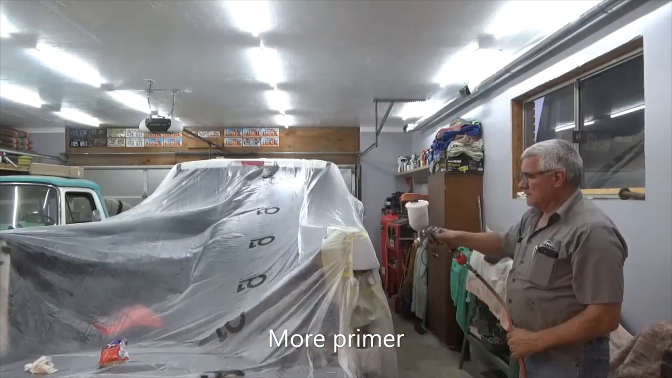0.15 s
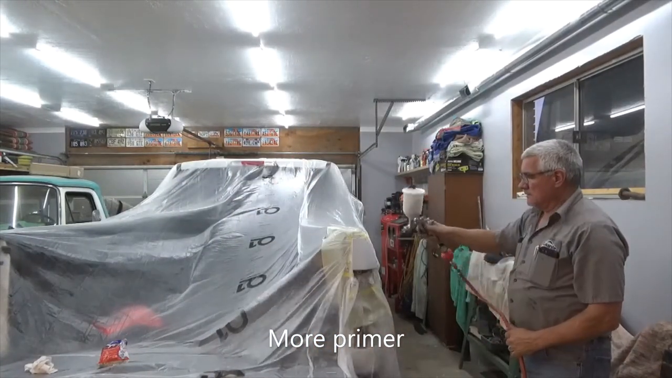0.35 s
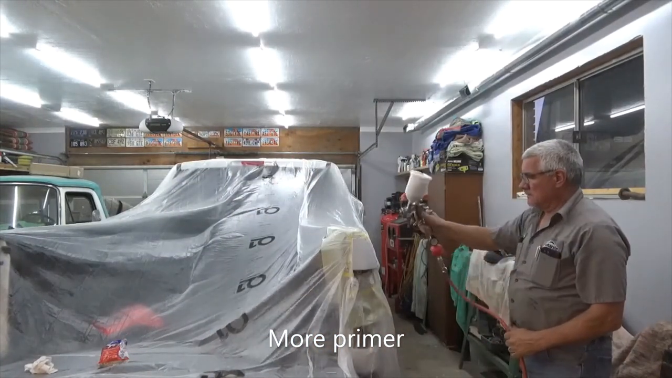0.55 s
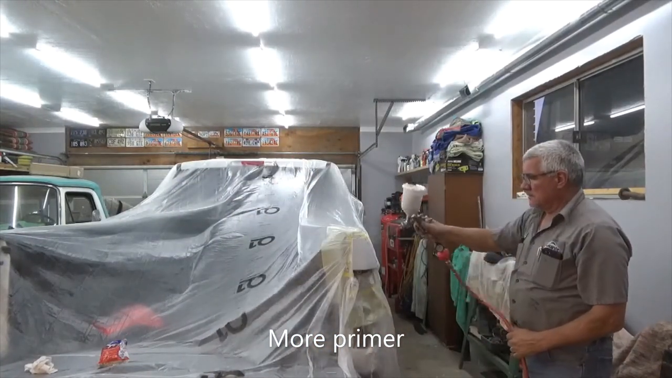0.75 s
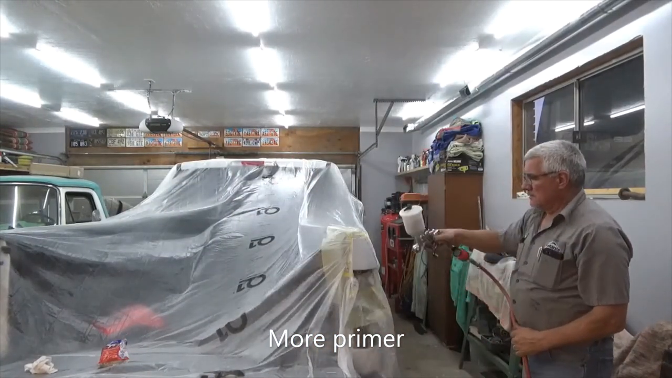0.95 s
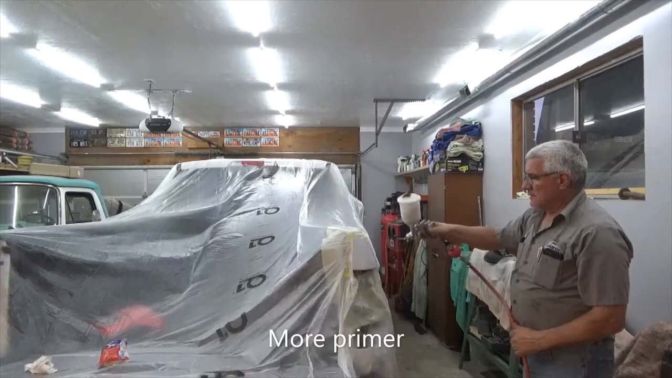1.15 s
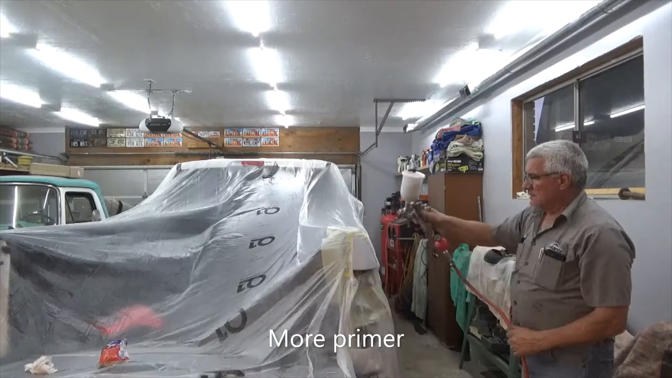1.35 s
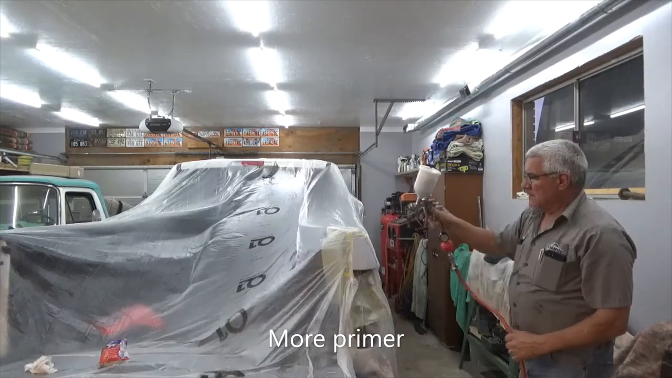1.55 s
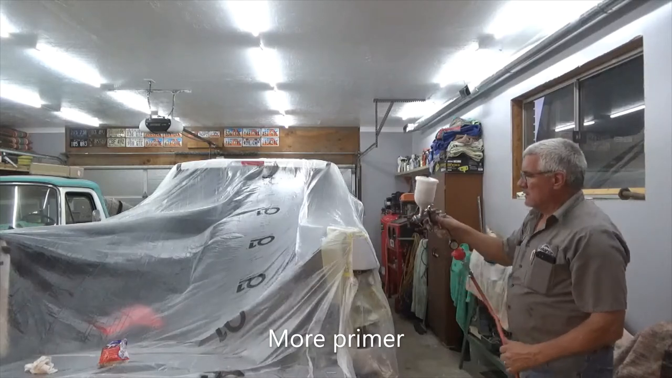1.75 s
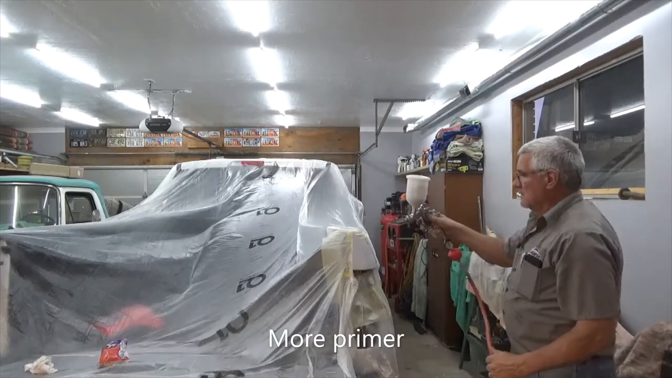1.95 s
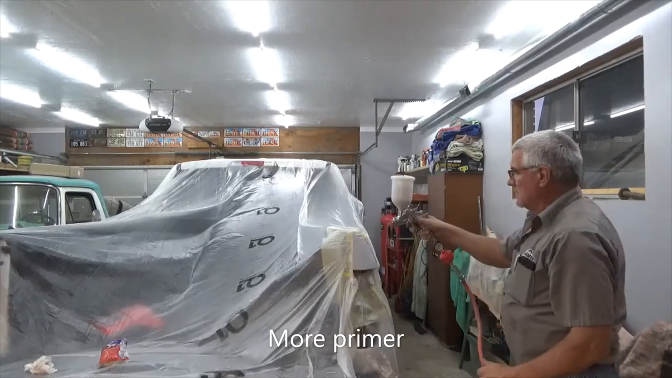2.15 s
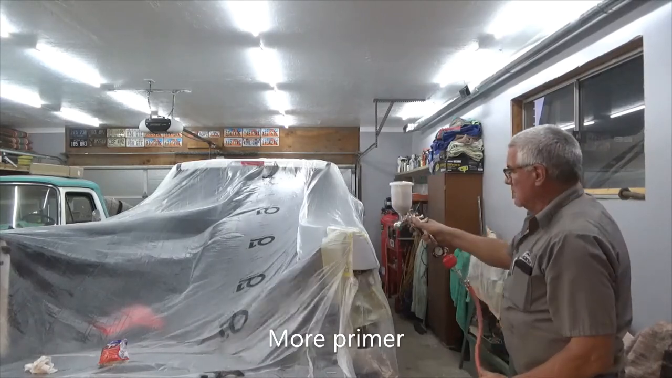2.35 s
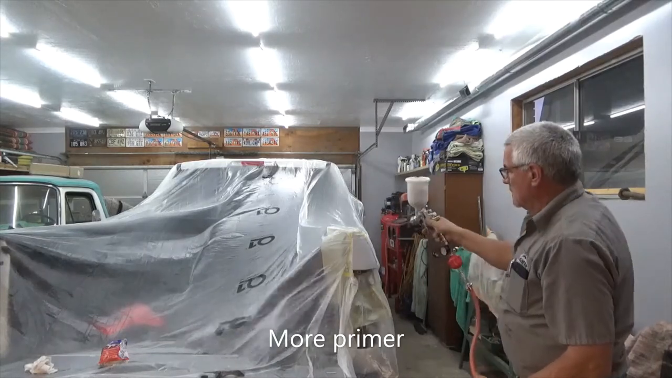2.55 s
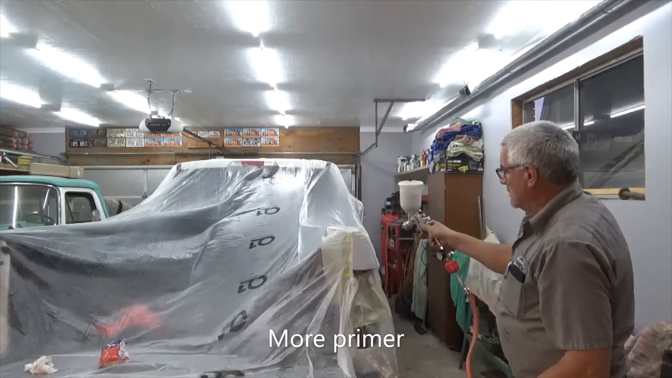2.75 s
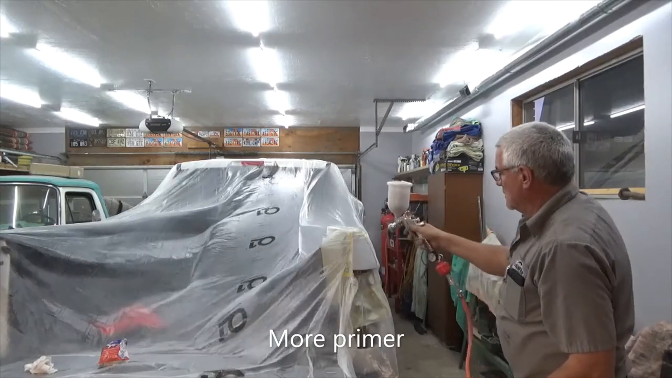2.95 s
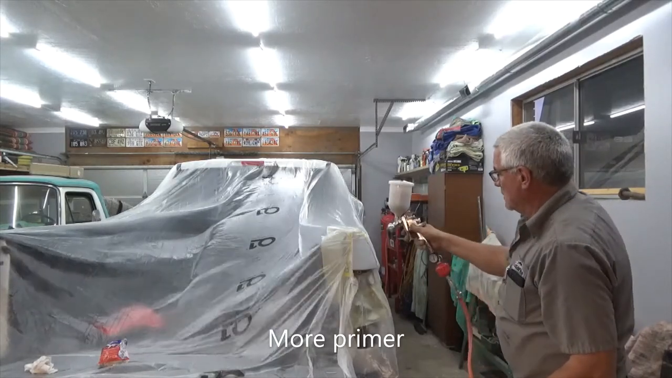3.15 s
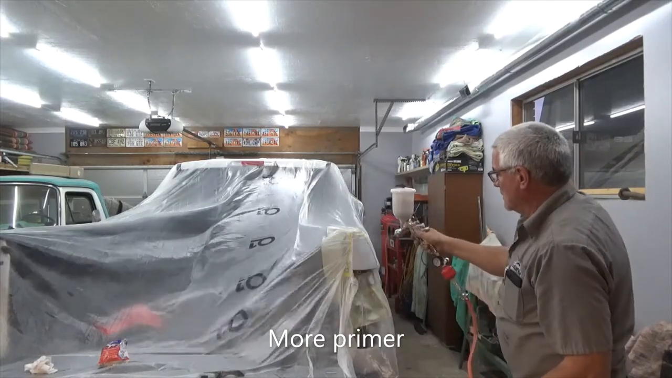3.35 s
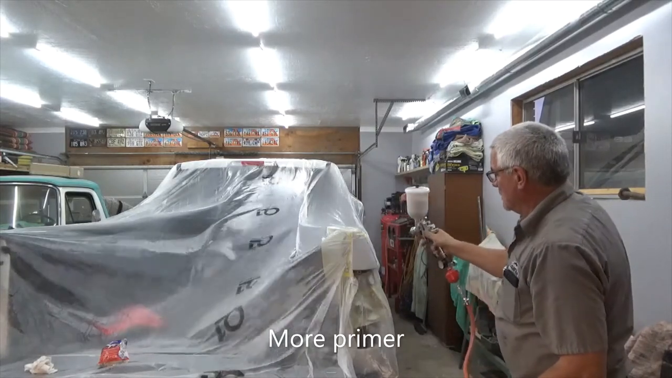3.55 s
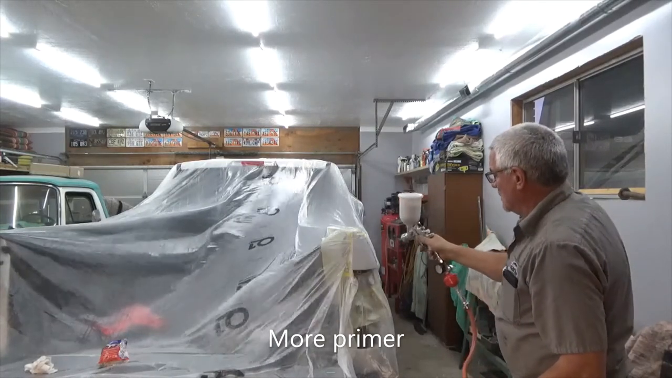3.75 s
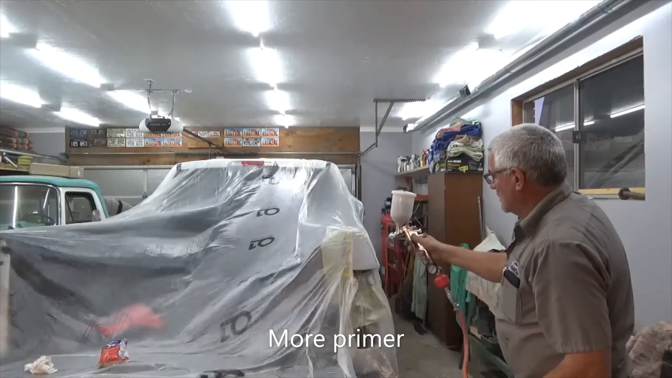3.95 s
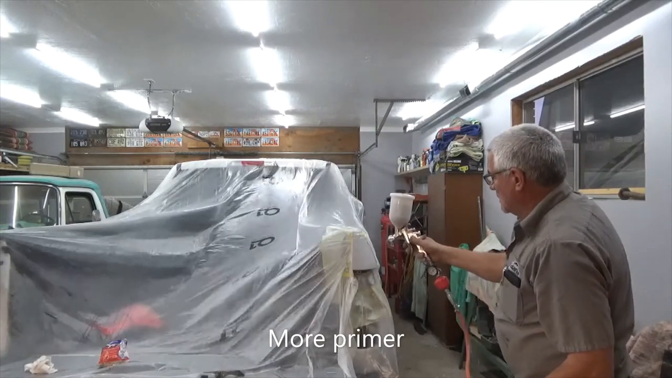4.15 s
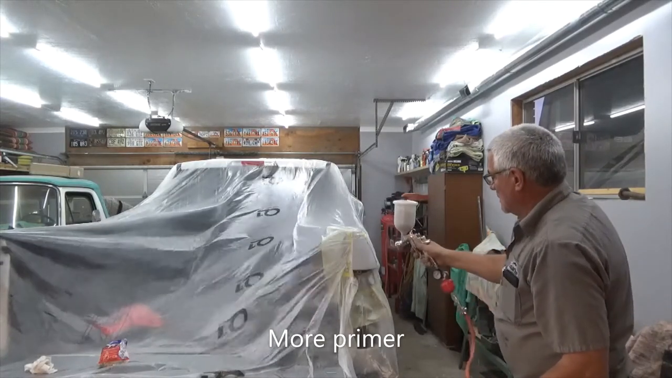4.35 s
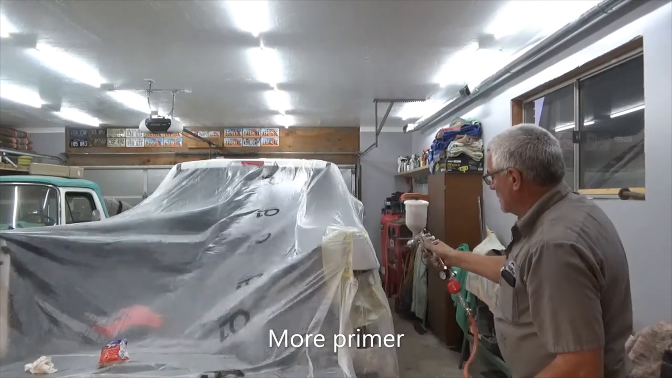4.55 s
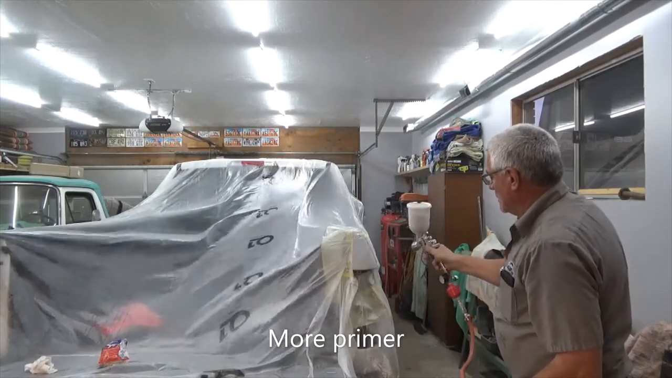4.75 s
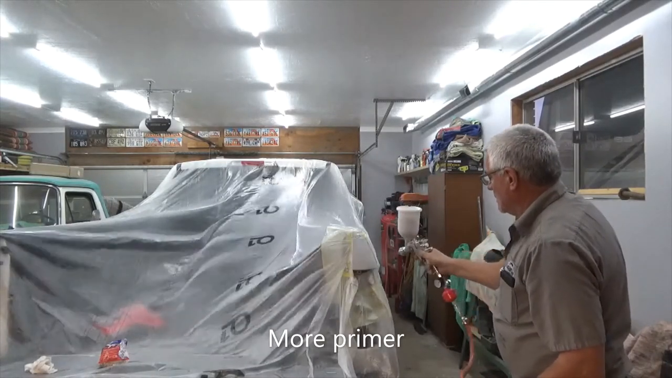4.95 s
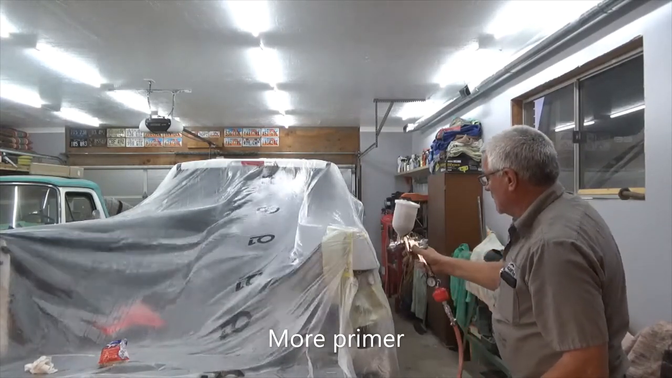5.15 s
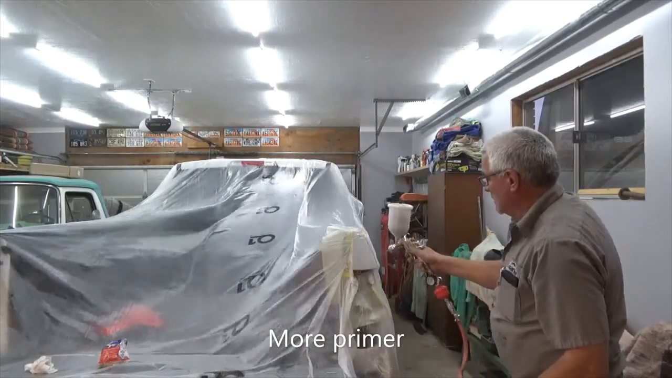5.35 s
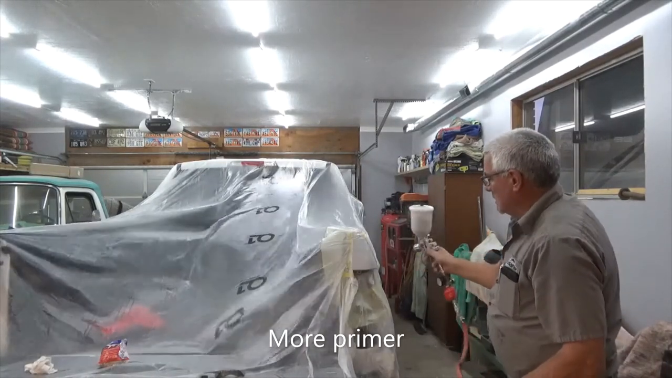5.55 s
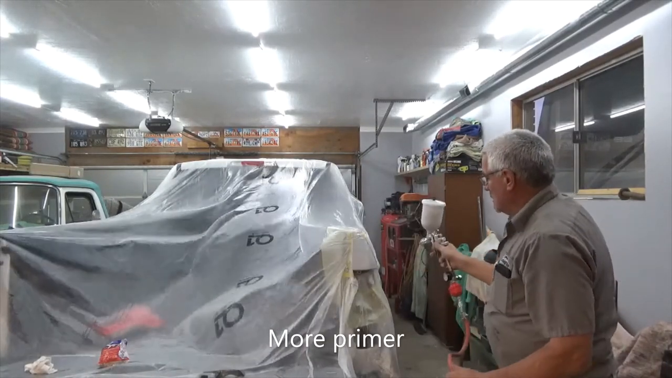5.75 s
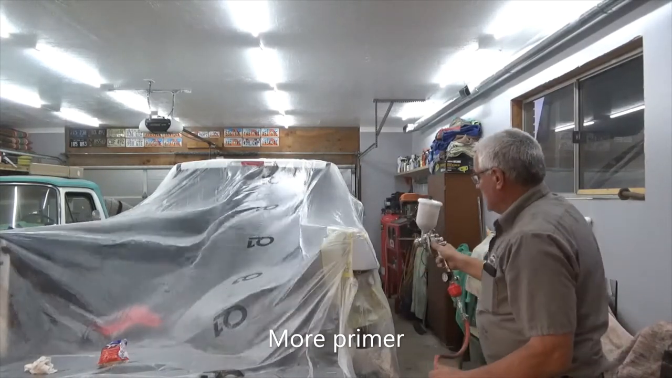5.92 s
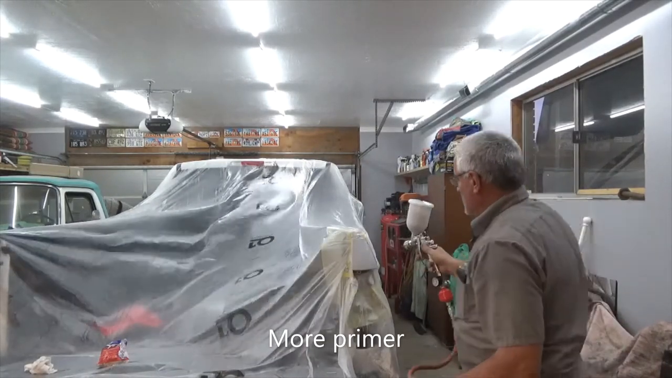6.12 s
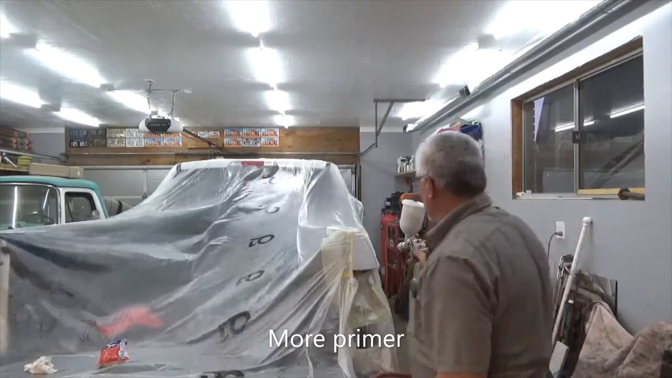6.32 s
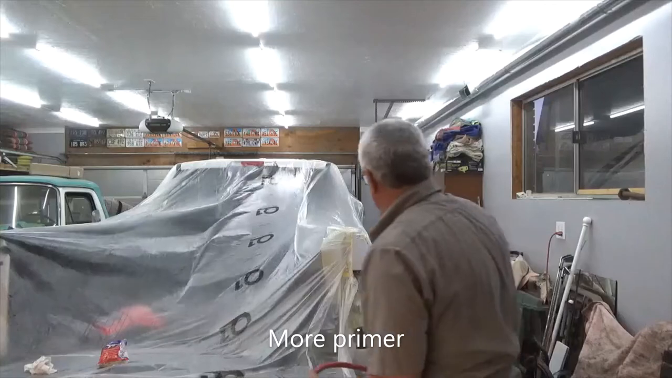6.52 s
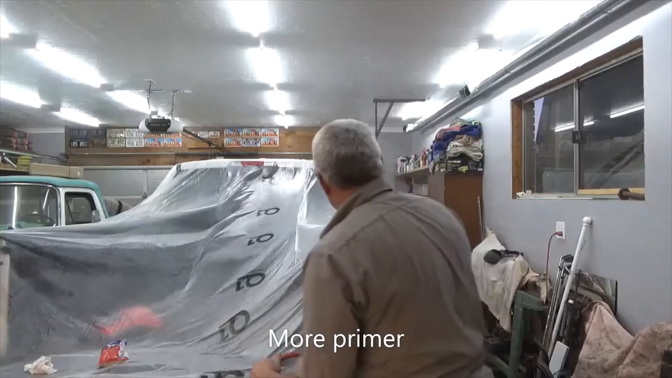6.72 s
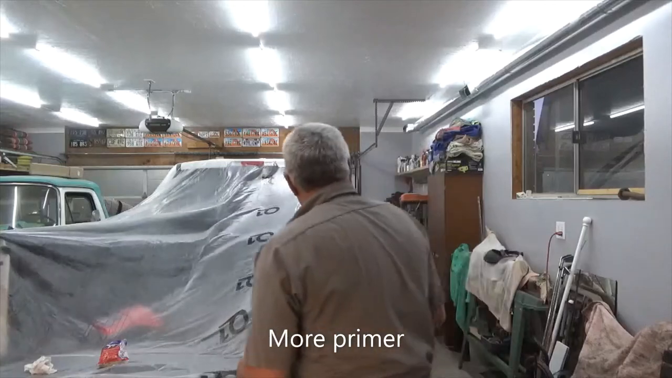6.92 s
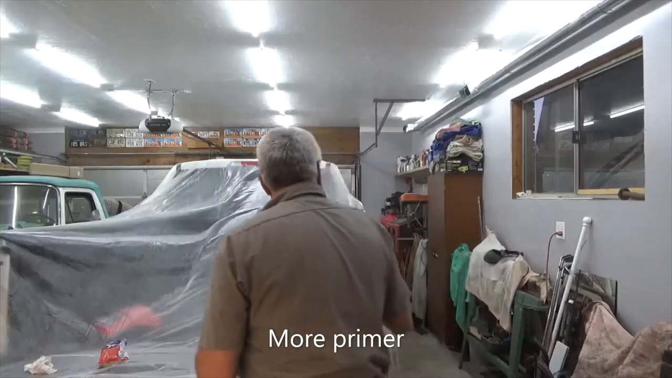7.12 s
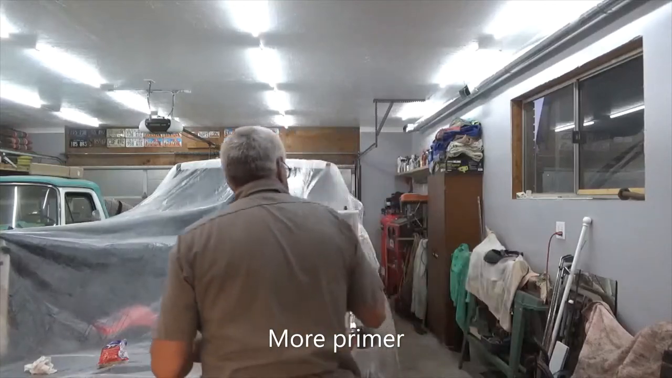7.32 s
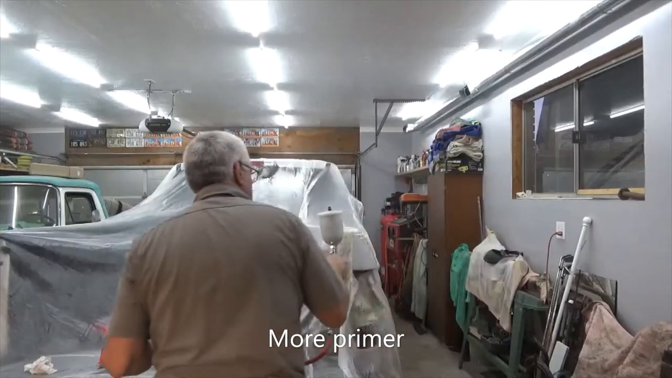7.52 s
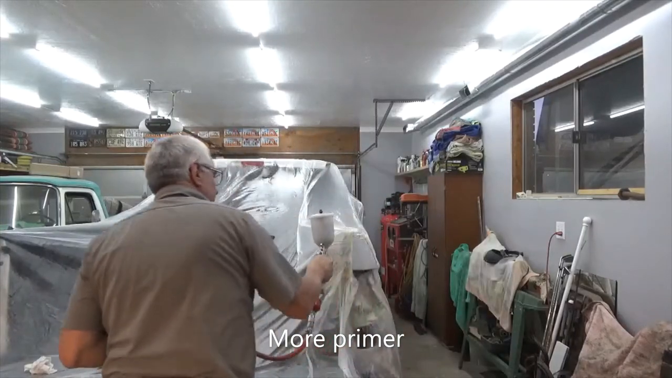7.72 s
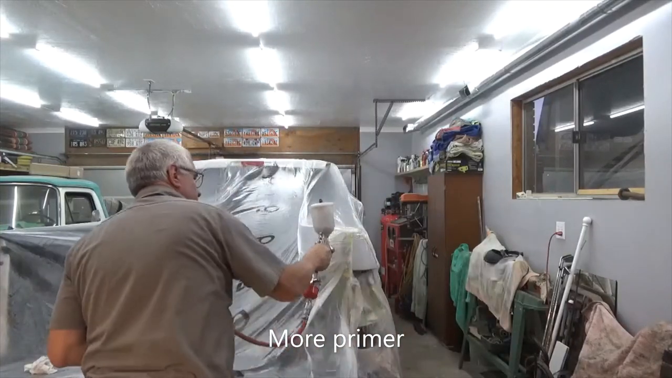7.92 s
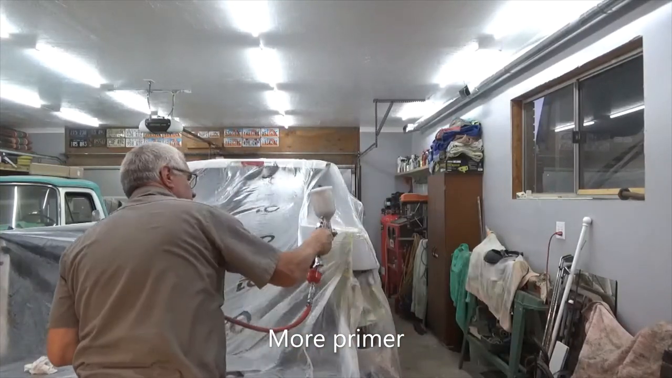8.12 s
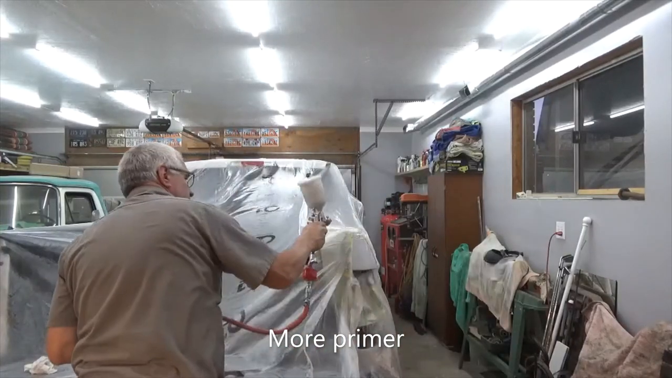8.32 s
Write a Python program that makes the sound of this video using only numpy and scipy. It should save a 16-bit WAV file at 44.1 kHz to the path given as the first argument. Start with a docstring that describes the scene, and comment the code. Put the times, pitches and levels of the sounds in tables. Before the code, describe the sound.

A spray gun hisses in short, sharp bursts in a reverberant garage over a low fan hum, pauses for faint scuffs, then sprays once more.

```python
"""A spray gun blasts at once: short bursts of primer on a panel, over the hum of a fan motor in a garage.
Each burst is shaped noise: a trigger pull dumps the pressure stored in the hose, then settles to a steady jet.
Between bursts a thin leak hisses, and bands of noise make the ticks and scuffs of feet, hose and gun.
The background is a wandering shaft tone, narrow noise bands of hum and a low rush; a limiter holds the hiss
and ducks the hum."""
import sys
import numpy as np
from scipy import signal
from scipy.fft import rfft, irfft
from scipy.io import wavfile
from scipy.ndimage import uniform_filter1d

SR = 44100
rng = np.random.default_rng(int(sys.argv[2]) if len(sys.argv) > 2 else 0)


def dump_mix(stems):
    """Bounce the given channels to the path in sys.argv[1] as a 16-bit WAV at rate SR."""
    frames = np.atleast_2d(stems).T  # one column per channel
    limited = np.clip(frames, -1, 1)  # hard clip at full scale
    pcm = np.round(limited * 32767).astype(np.int16)
    wavfile.write(sys.argv[1], SR, pcm)


N = 373968
T = np.arange(N) / SR
HZ = np.fft.rfftfreq(N, 1 / SR)

# One trigger pull and hand stroke a row: opens t/s, shuts t/s, steady jet level/dB,
# first blast level over the jet/dB, treble at the start level/dB, treble at the end level/dB
TRIGGER_PULLS = [(.046, 0.402, -14.5, 9.5, 1, -2.5), (.6, .888, -15.5, 11.5, -1, 2.5),
                 (1.045, 1.324, -15, 9, 1, -1), (2.072, 2.417, -15, 14, -1, -3),
                 (2.669, 2.978, -17, 12.5, 0, -1.5), (3.102, 3.437, -16, 11.5, 2, 0),
                 (3.609, 3.965, -16.5, 10, -1, 0), (4.079, 4.547, -17, 12.5, 0, 0),
                 (4.706, 5.076, -15.5, 9, 0.5, -2), (5.197, 5.427, -16.5, 13, -0.5, .5),
                 (7.666, 8.219, -15, 8.5, -1.5, -1.5)]
# Spectrum of the jet: f/Hz, density level/dB
JET_SPECTRUM = [(150, -37), (500, -22.5), (1000, -17.5), (2000, -11.5), (3000, -8.5), (4500, -6),
                (6300, -1.5), (7300, 0.5), (8300, 3), (9300, 2), (10200, 0), (11000, -4.5)]
# Spectrum of the leak: f/Hz, density level/dB
LEAK_SPECTRUM = [(500, -20), (2000, -5), (4000, -6.5), (5500, -1.5), (7000, 1), (9000, 4.5), (9800, 2),
                 (11000, -5.5)]
# The finger presses a little more or eases off: from t/s, to t/s, change of leak level/dB
FINGER_SHIFTS = [(-.1, .1, 4), (1.535, 1.74, 3), (1.78, 2.07, -7), (8.22, 8.5, 6)]
# Ticks, scuffs and swishes of feet, hose and gun: start t/s, source level/dB, centre f/Hz,
# width/octaves, rise t/s, 60 dB decay t/s
MOVEMENTS = [(1.528, -38, 4000, 1.2, .002, .05), (1.618, -36, 746, 0.38, 0.0051, 0.073),
             (6.236, -39, 3000, 1.2, 0.0073, 0.16), (6.632, -27.5, 8000, 0.33, 0.024, 0.42),
             (6.633, -31.5, 3200, 1.7, 0.022, 0.73), (6.65, -38.5, 750, 0.32, 0.017, 0.25),
             (6.846, -36.5, 1100, 0.8, 0.0059, 0.19), (6.849, -30, 9400, 1.2, 0.002, 0.027),
             (7.233, -33, 5500, 1, .0005, 0.022), (7.307, -30, 2200, 1.2, 0.00055, .015),
             (7.562, -23, 4500, .7, 0.00051, 0.01), (7.5675, -34, 4570, 0.83, .0006, 0.021)]
# Decay of the garage: f/Hz, 60 dB decay t/s
GARAGE_DECAY = [(200, 1), (1500, 0.51), (4000, 0.45), (8000, 0.29), (11000, 0.25)]
# Stereo width of the echoes: f/Hz, side minus mid level/dB
ECHO_WIDTH = [(100, -18), (500, -38), (1200, -5.5), (4000, -6.5), (8500, -8), (11000, -11)]
# Hum of the motor in the room: the shaft tone first, then narrow noise bands at motor orders
# and room modes: f/Hz, level/dB, width f/Hz
MOTOR_HUM = [(57.9, -46, 1.84), (113.8, -41.5, 4.9), (126.6, -44, 10), (167, -54, 13), (209.4, -55, 7.5),
             (236.7, -55.5, 4.9), (280.2, -53, 19), (302, -53, 1.9), (351, -52.5, 3.4), (407, -57, 10),
             (466, -54, 20), (580, -57.5, 15), (1076, -63.5, 10), (1383, -61, 28)]
# Spectrum of the low rush: f/Hz, density level/dB
RUSH_SPECTRUM = [(20, -23), (45, -6), (70, -4.5), (88, 0.5), (130, 3), (185, -16), (290, -7.5), (420, -9),
                 (520, -14), (900, -19.5), (1500, -22), (2600, -26), (6000, -31), (11000, -40)]
# Slow course of the low rush's level: t/s, level/dB
LOW_RUSH_COURSE = [(0, -35), (2, -38), (3.6, -40), (5.6, -38.5), (7.5, -33.5), (8.48, -35.5)]
# Stereo width of the fan: f/Hz, side minus mid level/dB
FAN_SPREAD = [(50, -43), (125, -19.5), (280, -17), (600, -7.5), (2000, -4.5), (10000, -3)]
# The fan's place in the room's standing waves: f/Hz, left minus right level/dB
FAN_BALANCE = [(60, 0.5), (130, -0.1), (270, 2), (500, 1.7), (1200, 4.2), (4000, 0)]

EDGE_HZ = 11120  # upper edge of the whole mix
VALVE_OPEN_S, VALVE_SHUT_S = .018, .003  # opening travel; time constant of shutting
VALVE_CRACKED_DB = -35  # jet level as the valve cracks open, relative to fully open
MID_STROKE_DB = -1.5  # treble dip in mid-stroke, where the nozzle points away
LEAK_DB, FINGER_S = -46, .07  # leak with the trigger at rest; time the finger takes to shift


def amp(db):
    """Decibels to gain."""
    return 10 ** (np.asarray(db) / 20)


def unit(x):
    """Scales to an rms of one."""
    return x / np.sqrt(np.mean(x ** 2) + 1e-20)


def at_hz(points, hz):
    """Reads a spectrum on a log-frequency axis."""
    f, value = np.transpose(points)
    return np.interp(np.log(hz + 1), np.log(f + 1), value)


def colour(x, gain):
    """Filters by a gain for each frequency."""
    return irfft(rfft(x) * gain, N)


def noise(gain):
    """Noise of rms one with the given spectrum."""
    bins = rng.standard_normal(len(HZ)) + 1j * rng.standard_normal(len(HZ))
    return unit(irfft(gain * bins, N))


def short_noise(gain, size):
    """A short stretch of noise of rms one with the given spectrum."""
    return unit(irfft(rfft(rng.standard_normal(size)) * gain, size))


def drift(rate_hz):
    """Slow random wander of rms one."""
    return noise(1 / (1 + (HZ / rate_hz) ** 4))


def spray(blast_time_s=0.024, blast_tilt_db=3.0, flutter_db=0.56):
    """Turbulent air at the nozzle: the charged hose adds a louder, brighter blast to the steady jet."""
    out, size = np.zeros(N), SR
    t, hz = np.arange(size) / SR, np.fft.rfftfreq(size, 1 / SR)
    # jet noise grows steeply with the valve's lift
    opening = amp(VALVE_CRACKED_DB * np.maximum(1 - t / VALVE_OPEN_S, 0) ** 1.2)
    # the hose empties once the valve is fully open
    surplus = np.exp(-np.maximum(t - VALVE_OPEN_S, 0) / blast_time_s)
    octaves = np.log2((hz + 100) / 8000)
    jet_db = at_hz(JET_SPECTRUM, hz)
    steady_shape = amp(jet_db) * (hz < EDGE_HZ)
    blast_shape = amp(jet_db + blast_tilt_db * octaves) * (hz < EDGE_HZ)
    for opens, shuts, jet_level_db, blast_db, _, _ in TRIGGER_PULLS:
        steady = short_noise(steady_shape, size)
        blast = short_noise(blast_shape, size)
        valve = opening * np.exp(-np.maximum(t - (shuts - opens), 0) / VALVE_SHUT_S)
        burst = amp(jet_level_db) * valve * (steady + amp(blast_db) * surplus * blast)
        part = out[max(round(opens * SR), 0):][:size]
        part += burst[:len(part)]
    return out * amp(flutter_db * drift(21))


def sweep(x, beam_hz=5500):
    """Only the treble is beamed: each stroke glides from its first to its last level, dipping midway."""
    aim_db = np.zeros(N)
    for opens, shuts, _, _, first_db, last_db in TRIGGER_PULLS:
        way = np.clip((T - opens) / (shuts - opens), 0, 1)
        stroke_db = first_db + (last_db - first_db) * way + MID_STROKE_DB * np.sin(np.pi * way)
        aim_db = np.where(T >= opens, stroke_db, aim_db)
    treble = colour(x, 1 - 1 / (1 + (HZ / beam_hz) ** 4))
    return x + (amp(aim_db) - 1) * treble


def panel(x, delay_s=.0024, sway_s=0.000423, share=0.13):
    """The panel throws a little hiss back; the hand's sweep moves the delay, so the colour shifts."""
    reflection = np.interp(T - delay_s - sway_s * drift(1.42), T, x)
    return (x + share * reflection) / np.hypot(1, share)


def leak():
    """A thin hiss of air past the trigger's first stage, following small shifts of the finger."""
    shift_db = np.zeros(N)
    for start, end, change_db in FINGER_SHIFTS:
        inside_s = np.minimum(T - start, end - T)
        shift_db += change_db * np.clip(.5 + inside_s / FINGER_S, 0, 1)
    hiss = noise(amp(at_hz(LEAK_SPECTRUM, HZ)) * (HZ < EDGE_HZ))
    return hiss * amp(LEAK_DB + shift_db)


def knocks():
    """Ticks, scuffs and swishes: bands of noise that swell and fade with no ring."""
    out, size = np.zeros(N), SR
    t, hz = np.arange(size) / SR, np.fft.rfftfreq(size, 1 / SR)
    for start, db, centre, width, rise, t60 in MOVEMENTS:
        band = np.exp(-.5 * (np.log2((hz + 1) / centre) / width) ** 2) * (hz < EDGE_HZ)
        level = np.minimum(t / rise, 1) * amp(db - 60 * np.maximum(t - rise, 0) / t60)
        knock = short_noise(band, size) * level
        part = out[round(start * SR):][:size]
        part += knock[:len(part)]
    return out


def tails(count, first_echo_s=0.0023):
    """Mid and side echoes of the garage for several places of the gun; the treble dies first."""
    size = SR // 2
    hz, t, grains = signal.stft(rng.standard_normal((count, 2, size)), SR, nperseg=256)
    t60 = np.maximum(at_hz(GARAGE_DECAY, hz), .05)
    grains = grains * amp(-60 * t / t60[:, None])
    grains[:, 1] *= amp(at_hz(ECHO_WIDTH, hz))[:, None]
    echoes = signal.istft(grains, SR, nperseg=256)[1][..., :size] * (T[:size] > first_echo_s)
    return echoes / np.linalg.norm(echoes[0, 0])


def garage(x, wet_db=0, lean_db=-0.12, count=36):
    """Direct sound plus echoes; the restless, moving jet passes from one pattern of echoes to the next."""
    size = SR // 32  # hop from one echo pattern to the next
    fade, echoes = np.sin(np.pi * np.arange(2 * size) / (2 * size)), tails(count)
    padded, room = np.pad(x, (size, 2 * size)), np.zeros((2, N + SR))
    for k, start in enumerate(range(0, N + size, size)):
        slice_in = padded[start:start + 2 * size] * fade
        ring = signal.fftconvolve(slice_in[None], echoes[k % count], axes=1)
        room[:, start:start + ring.shape[1]] += ring
    mid, side = amp(wet_db) * room[:, size:size + N]
    left = (x + mid + side) * amp(lean_db)
    right = (x + mid - side) * amp(-lean_db)
    return np.array([left, right]) / np.hypot(1, amp(wet_db))


def fan(waver_db=1.08):
    """A wandering shaft tone and narrow bands of hum in a low rush, spread wide and a little to the left."""
    hum_power = np.zeros(len(HZ))
    for hz, db, width in MOTOR_HUM[1:]:
        band = 1 / (1 + (2 * (HZ - hz) / width) ** 4)
        hum_power += amp(2 * db) * band / band.sum()
    hum_shape = np.sqrt(hum_power)
    hum_gain = np.linalg.norm(hum_shape)  # restores the summed level of the bands

    shaft_hz, shaft_db, shaft_width = MOTOR_HUM[0]
    wandering_hz = shaft_hz + shaft_width / 2 * drift(2.4)
    shaft = np.sqrt(2) * amp(shaft_db) * np.sin(2 * np.pi * np.cumsum(wandering_hz) / SR)

    rush_level = amp(np.interp(T, *np.transpose(LOW_RUSH_COURSE)) + waver_db * drift(7))
    rush_shape = amp(at_hz(RUSH_SPECTRUM, HZ))
    mid, side = (rush_level * noise(rush_shape) + hum_gain * noise(hum_shape) for _ in range(2))
    mid = mid + shaft
    side = colour(side, amp(at_hz(FAN_SPREAD, HZ)))
    lean = amp(at_hz(FAN_BALANCE, HZ) / 2)
    return np.array([colour(mid + side, lean), colour(mid - side, 1 / lean)])


def scene():
    """Gun and painter in the garage, over the fan."""
    gun = panel(sweep(spray()) + leak())
    return garage(gun + knocks()) + fan()


def limiter(x, threshold_db=-18.0, slope=0.88, sense_s=0.0011, recovery_db_per_s=220):
    """Turns everything down within milliseconds when the power passes the threshold, and recovers quickly."""
    keep = np.exp(-1 / (sense_s * SR))
    power = signal.lfilter([1 - keep], [1, -keep], (x ** 2).mean(0))
    power_db = 10 * np.log10(power + 1e-12)
    # the held level falls no faster than the recovery rate
    fall = recovery_db_per_s * T
    held_db = np.maximum.accumulate(power_db + fall) - fall
    excess_db = uniform_filter1d(np.maximum(held_db - threshold_db, 0), size=128)
    return x * amp(-slope * excess_db)


def record(dry):
    """The limiter, then a steep low-pass at the upper edge."""
    low_pass = signal.firwin(801, EDGE_HZ, window=("kaiser", 9), fs=SR)
    return signal.oaconvolve(limiter(dry), low_pass[None], "same")


dry = scene()
out = record(dry)
dump_mix(out)
```